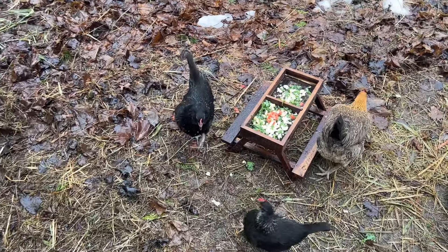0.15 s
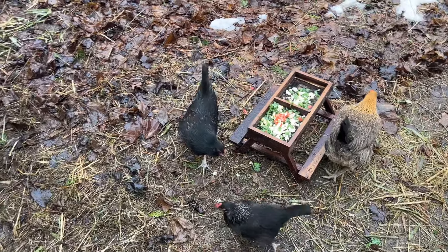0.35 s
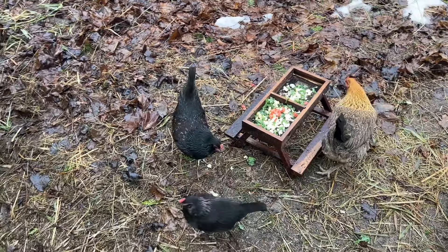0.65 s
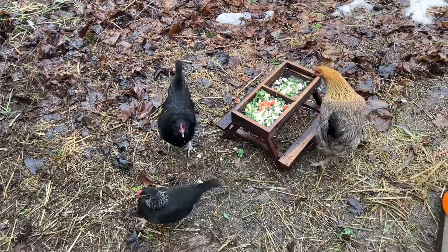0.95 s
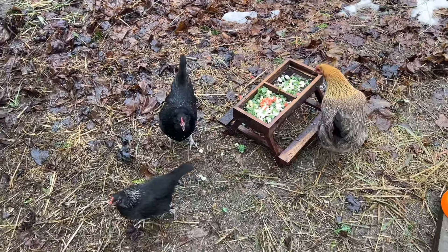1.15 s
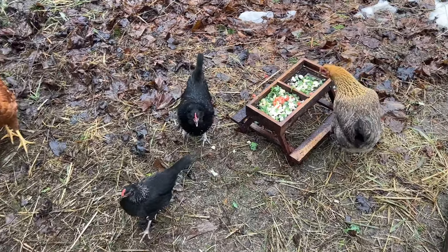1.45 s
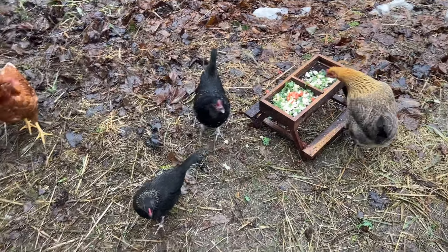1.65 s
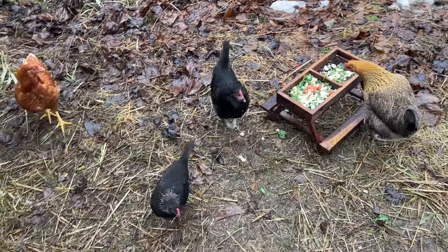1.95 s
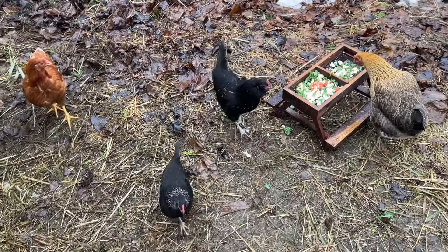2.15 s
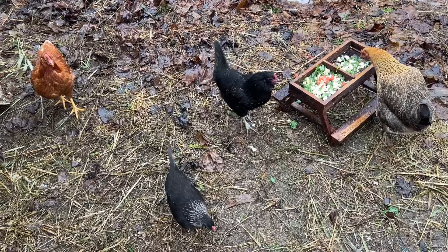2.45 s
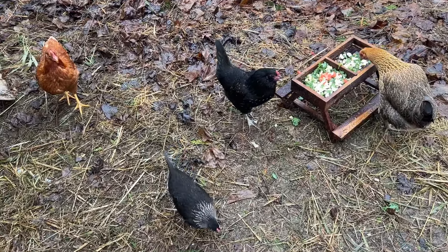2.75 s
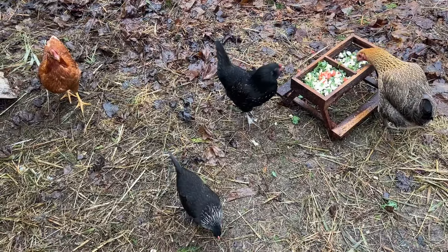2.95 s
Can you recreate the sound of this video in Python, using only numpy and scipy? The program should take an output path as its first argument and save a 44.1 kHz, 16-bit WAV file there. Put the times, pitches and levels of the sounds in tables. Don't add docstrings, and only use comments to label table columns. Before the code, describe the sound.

A hen close by squawks twice, each call starting low and flipping into a long, breaking whistle, with short clucks and another hen's soft croon, straw rustling, over wind buffets and distant traffic in an open yard.

```python
import sys
import numpy as np
from scipy import signal
from scipy.fft import rfft, irfft
from scipy.io import wavfile
from scipy.ndimage import uniform_filter1d

SR = 44100
rng = np.random.default_rng(int(sys.argv[2]) if len(sys.argv) > 2 else 0)


def wav_record(signal):
    frames = np.transpose(np.atleast_2d(signal))
    bounded = np.clip(frames, -1, 1)
    quanta = np.round(bounded * 32767).astype(np.int16)
    wavfile.write(sys.argv[1], SR, quanta)


def voltage_ratio(level):
    return 10 ** (np.asarray(level, float) / 20)


N = 136710
T = np.arange(N) / SR
BIN_HZ = np.fft.rfftfreq(N, 1 / SR)


def evened(x):
    return x / np.sqrt(np.mean(x ** 2) + 1e-20)


def read(points, hz):
    f, value = np.transpose(points)
    return np.interp(np.log(hz + 1), np.log(f + 1), value)


def wander(hz, size=N):
    return evened(signal.lfilter(*signal.butter(2, hz, fs=SR), rng.standard_normal(size)))


def colour(x, points):
    hz = np.fft.rfftfreq(x.shape[-1], 1 / SR)
    return irfft(rfft(x) * voltage_ratio(read(points, hz)), x.shape[-1])


def gate(start, length, edge):
    return np.clip(np.minimum(T - start, start + length - T) / edge + .5, 0, 1)


# start in seconds, length in seconds, share of pitch lost.
SLIPS = [(0.842, .01, .09), (0.86, .008, .06), (0.918, .014, .14), (1.038, .007, -.09), (1.068, .007, .05),
         (1.124, .015, .14), (1.221, .013, .08), (1.242, .012, .035), (1.248, .008, .09),
         (1.273, .009, .09), (1.368, .009, .06), (1.485, .006, .05), (1.512, .005, .05), (1.527, .006, .05),
         (1.621, .01, .12), (1.643, .008, .13), (2.163, .004, .05), (2.19, .004, .06), (2.202, .009, .08),
         (2.23, .004, .04), (2.246, .004, .05), (2.253, .012, .15), (2.27, .02, .16), (2.315, .014, .14),
         (2.337, .007, .11), (2.398, .033, .15), (2.493, .011, .13), (2.551, .008, .12), (2.594, .007, .14),
         (2.626, .008, .15), (2.676, .011, .18), (2.692, .005, .11), (2.711, .004, .07)]
# start in seconds, length in seconds, half-line level in dB.
PULSE_DOUBLING = [(1.023, 0.022, -10.5), (1.133, 0.037, -9), (1.287, 0.068, -22.5), (1.406, 0.026, -4),
                  (1.558, 0.039, -5.5), (1.59, 0.008, -24), (1.637, 0.04, -16.5), (1.661, 0.014, -8),
                  (2.151, 0.048, -7.5), (2.246, 0.0078, -14), (2.287, 0.034, -3), (2.44, .045, -16.5),
                  (2.559, 0.061, -12.5), (2.712, 0.011, -11.5), (2.783, 0.025, -15.5)]
# start in seconds, length in seconds, change in dB.
DROPOUTS = [
    (0.482, 0.032, -2.5),
    (0.527, 0.012, -15.5),
    (0.602, 0.0059, -20),
    (0.625, .012, 7),
    (0.712, 0.017, -11),
    (0.761, .014, -4),
    (2.009, 0.0096, -8.5),
]
SLIP_EDGE_S, SLIP_LEVEL_DB, SLIP_ROUGH = .0025, -30, .7
FLUTTER, JITTER = .013, .09
BRIGHTEN_DB_PER_OCTAVE = .3


def voice(rows, throat, rough, patchy_db=1.01, hiss_db=-40):
    s, hz, db = np.transpose(rows)
    on = (T >= s[0]) & (T < s[-1])
    t = T[on]
    n = len(t)

    slip = 0
    for start, length, loss in SLIPS:
        deepening = 0.6 + .55 * np.clip((T - start) / length, 0, 1)
        slip = slip + loss * gate(start, length, SLIP_EDGE_S) * deepening
    slip = slip[on]
    half = sum(voltage_ratio(d) * gate(a, w, 0.0032) for a, w, d in PULSE_DOUBLING)[on]
    rough = np.clip(rough + SLIP_ROUGH * abs(slip) + 0.23 * half, 0, .9)
    level = np.interp(t, s, db) + sum(d * gate(a, w, 0.0038) for a, w, d in DROPOUTS)[on]

    shake = FLUTTER * wander(110, size=n) + JITTER * rough * wander(460, size=n)
    f = np.interp(t, s, hz) * (1 - slip + shake)
    turns = np.cumsum(f) / SR

    k = np.arange(1, 39)[:, None] / 2
    effort = BRIGHTEN_DB_PER_OCTAVE * (level - db.max()) * np.log2(np.maximum(k, 2) / 2)
    gains = voltage_ratio(read(throat, k * f) + effort)
    gains = gains * np.where(k % 1, half, 1) * (k * f < 15800)
    drift = np.array([wander(84, size=n) for _ in k])
    shimmer = voltage_ratio(drift * 1.05 * np.minimum(k - .5, 4))
    lines = gains * shimmer * np.cos(2 * np.pi * k * turns + k ** 2)
    tone = lines.sum(0) / np.sqrt((gains ** 2).sum(0) / 2)

    air = (0.39 + np.exp(-(turns % 1) / 0.39)) * rng.standard_normal(n)
    breath = evened(colour(air, [(1200, -26.5), (2200, -11.5), (5000, -9.0), (15000, -25.5)]))
    hiss = breath * voltage_ratio(hiss_db + 2.5 * wander(30, size=n))
    rasp = evened(colour(air, throat))

    envelope = gate(s[0] + 0.0016, s[-1] - s[0] - .002, 0.0013)[on]
    envelope = envelope * voltage_ratio(level + SLIP_LEVEL_DB * abs(slip) + patchy_db * wander(28, size=n))
    out = np.zeros(N)
    out[on] = envelope * (np.sqrt(1 - rough ** 2) * tone + rough * rasp + hiss)
    return out


# time in seconds, pitch in Hz, level in dB.
LOW_START_1 = [
    (.165, 553, -48),
    (.19, 566.6, -42),
    (.31, 640, -34),
    (.326, 634, -40.5),
    (.332, 790, -34),
    (.358, 817, -31.5),
    (.37, 960, -50),
]
WAVERING_1 = [
    (.368, 1204, -38.5),
    (.384, 1074, -47),
    (.424, 1058, -35.5),
    (.436, 1144, -42),
    (.51, 1250, -43.5),
    (.545, 1151, -41.5),
    (.6, 1191, -38.5),
    (.622, 1246, -48),
    (.8, 1381, -47.5),
]
HIGH_WHISTLE_1 = [
    (.8, 1397, -44),
    (.83, 1340, -36.5),
    (.88, 1370, -35),
    (1.09, 1369, -31.5),
    (1.32, 1422, -30.5),
    (1.38, 1391, -30.5),
    (1.55, 1458, -29),
    (1.68, 1419, -26.5),
    (1.7, 1320, -32.5),
]
# frequency in Hz, gain in dB.
LOW_THROAT_1 = [(500, 7.5), (1200, 2.5), (1600, 10.5), (1720, -13.5), (1950, -3.5), (2500, -17.5),
                (4000, -37.5), (15000, -57)]
HIGH_THROAT_1 = [(700, -10), (1350, 6), (2300, 1.5), (2850, -4.5), (4200, -15.5), (5600, -21.5),
                 (7000, -17), (15000, -46)]


def first_squawk():
    waver_throat = [(1100, 0), (2200, -3), (2600, -8), (3300, -30), (3900, -19), (6000, -40)]
    x = voice(LOW_START_1, LOW_THROAT_1, .05)
    x += voice(WAVERING_1, waver_throat, .3, patchy_db=2.5)
    return x + voice(HIGH_WHISTLE_1, HIGH_THROAT_1, .07, hiss_db=-29)


# time in seconds, pitch in Hz, level in dB.
LOW_START_2 = [
    (1.974, 677, -35),
    (1.982, 707, -24),
    (1.992, 774, -26.5),
    (2.008, 803, -23),
    (2.02, 823, -34.5),
    (2.043, 848, -37),
    (2.05, 824, -28),
    (2.105, 820, -25.5),
    (2.114, 853, -44.5),
]
HIGH_WHISTLE_2 = [
    (2.11, 1300, -41),
    (2.118, 1500, -26),
    (2.127, 1099, -37.5),
    (2.156, 1169, -32),
    (2.16, 1340, -25.5),
    (2.25, 1360, -24.5),
    (2.295, 1440, -24.5),
    (2.779, 1522, -22.5),
]
FALLING_END_2 = [
    (2.776, 1330, -25),
    (2.782, 1247, -26.5),
    (2.795, 1130, -30),
    (2.81, 1085, -28.5),
    (2.814, 902, -22),
    (2.825, 839, -22.5),
    (2.836, 744, -36.5),
]
# frequency in Hz, gain in dB.
LOW_THROAT_2 = [(700, -0.5), (1500, 4.5), (2400, -13), (3100, -38.5), (3900, -26), (6500, -29),
                (15000, -26.5)]
HIGH_THROAT_2 = [(600, -20.5), (1500, 6), (2000, -1.5), (2600, -18.5), (3000, -25), (4400, -23),
                 (7000, -48), (15000, -58)]
FALL_THROAT = [(700, -5.5), (1100, 1.5), (1500, 3), (1750, 8), (2100, -0.5), (2500, -15), (3700, -24),
               (15000, -41)]


def second_squawk():
    x = voice(LOW_START_2, LOW_THROAT_2, .01, hiss_db=-50)
    x += voice(HIGH_WHISTLE_2, HIGH_THROAT_2, .05, hiss_db=-31)
    return x + voice(FALLING_END_2, FALL_THROAT, .15, hiss_db=-28)


# start in seconds, length in seconds, pitch in Hz, level in dB.
CLUCK_NOTES = [
    (0.154, 0.045, 776, -40.5),
    (0.636, 0.02, 1050, -55),
    (0.661, 0.019, 750, -46),
    (0.694, 0.019, 1180, -37),
    (0.753, 0.04, 825, -39),
    (0.796, 0.013, 850, -32.5),
    (1.699, 0.0066, 957, -28.5),
    (2.012, 0.018, 1004, -27),
    (2.032, 0.02, 1033, -31),
]
CLUCK_SAG = 0.049


def clucks():
    dull = [(800, -0.5), (1600, -23.5), (4000, -46.5)]
    bright = [(800, -12), (1800, 13), (2300, 9), (3200, -28.5), (6000, -30)]
    x = np.zeros(N)
    for start, length, hz, db in CLUCK_NOTES:
        track = [(start, hz, db - 5.5),
                 (start + length * 0.35, hz, db),
                 (start + length, hz * (1 - CLUCK_SAG), db - 5.0)]
        x += voice(track, dull if start < .3 or hz < 805 else bright, 0.35)
    return x


# time in seconds, pitch in Hz, level in dB.
CROON_TRACK = [
    (0.38, 413, -50.5),
    (.41, 446, -48.5),
    (0.5, 461, -44),
    (.66, 440, -47.5),
    (0.7, 435, -59.5),
]


def croon():
    return voice(CROON_TRACK, [(450, 8.5), (1800, -89)], 0.067)


def hens():
    return first_squawk() + second_squawk() + clucks() + croon()


# start in seconds, length in seconds, pitch in Hz, level in dB.
CHEEP_NOTES = [
    (.04, .04, 5750, -60),
    (.1, .09, 4850, -61),
]


def cheeps():
    x = np.zeros(N)
    for start, length, hz, db in CHEEP_NOTES:
        level = voltage_ratio(db + 3 * np.tanh(wander(50)))
        x += level * gate(start, length, .012) * np.sin(2 * np.pi * hz * T)
    return x


# time in seconds, level in dB.
STRAW_LEVEL = [
    (0, -61),
    (.12, -68.5),
    (.4, -76.5),
    (.5, -65),
    (.7, -52.5),
    (.9, -69),
    (1.1, -82.5),
    (2.75, -77.5),
    (2.85, -61.5),
    (3.02, -70.5),
]
# time in seconds, level in dB.
STRAW_TICKS = [
    (2.871, -65),
    (2.953, -44.5),
]


def straw():
    rustle = evened(colour(rng.standard_normal(N), [(1500, -0.5), (5000, 3.5), (15000, -12.0)]))
    x = rustle * voltage_ratio(np.interp(T, *np.transpose(STRAW_LEVEL), -120, -120))
    sharp = evened(colour(rng.standard_normal(N), [(2000, -21), (7000, -11), (15000, -14.5)]))
    for s, db in STRAW_TICKS:
        x += sharp * (T > s) * voltage_ratio(db - 60 * np.abs(T - s) / 0.024)
    return x


YARD_DB, YARD_T60_S = -17, .09


def yard(x):
    t = np.arange(SR // 3) / SR
    sparse = rng.random((2, len(t))) < .05
    tail = rng.standard_normal((2, len(t))) * sparse * voltage_ratio(-60 * t / YARD_T60_S) * (t > .004)
    tail = tail / np.linalg.norm(tail[0])
    return voltage_ratio(YARD_DB) * signal.fftconvolve(x[None], tail, axes=1)[:, :N]


# middle in seconds, length in seconds, level in dB, top in Hz.
WIND_GUSTS = [(1.221, 0.11, -45, 180), (1.384, 0.072, -25.5, 130), (1.556, 0.14, -34.5, 200),
              (0.31, 0.021, -41, 111), (0.698, 0.029, -43.5, 110), (1.516, 0.022, -37, 402),
              (1.597, 0.016, -40, 353), (1.726, 0.049, -37, 120), (1.872, 0.1, -33.5, 183),
              (1.941, 0.019, -24, 376), (2.021, 0.072, -31.5, 460), (2.271, 0.11, -33.5, 398),
              (2.402, 0.12, -38, 388), (2.512, 0.45, -43.5, 249)]


def wind():
    out = np.zeros((2, N))
    rel = BIN_HZ / 58
    for middle, length, db, top_hz in WIND_GUSTS:
        shape = rel ** 4 / (1 + rel ** 4.72) / (1 + (BIN_HZ / top_hz) ** 4)
        air = evened(irfft(rfft(rng.standard_normal(N)) * shape, N))
        swell = np.exp(-((T - middle) / length) ** 2 * 2)
        out += air * voltage_ratio(db + 6 * np.tanh(wander(30))) * swell
    return out


# frequency in Hz, gain in dB.
WASH_COLOUR = [(35, -20), (100, 7.5), (300, -7), (800, 1), (1500, -8.5), (2800, -23), (6000, -33.5),
               (15000, -37.5)]
WASH_DB = -46
HUM_HZ, HUM_WIDTH_HZ, HUM_DB = 65, 14, -43


def traffic():
    wash = np.array([evened(colour(rng.standard_normal(N), WASH_COLOUR)) for _ in range(2)])
    wash = wash * voltage_ratio(WASH_DB + 1.6 * wander(6))
    band = 1 + ((BIN_HZ - HUM_HZ) / HUM_WIDTH_HZ) ** 4
    hum = irfft(rfft(rng.standard_normal((2, N))) / band, N)
    return wash + voltage_ratio(HUM_DB) * evened(hum)


# frequency in Hz, left lead in radians.
TREBLE_TURN = [(7000, 0), (9350, -np.pi), (10800, -np.pi), (12700, -2 * np.pi), (13200, -2 * np.pi),
               (14500, -2.3 * np.pi)]


def ports(x, turn, lean, same=((1, 1),)):
    low = np.clip((9300 - BIN_HZ) / 2500, 0, 1)
    z = rfft(np.atleast_2d(x))
    c = 1 - low * (1 - np.clip(read(same, BIN_HZ), 0, 1))
    turn = read(turn, BIN_HZ)
    whole_turns = 2 * np.pi * np.round(turn[-1] / 2 / np.pi)
    turn = low * turn + (1 - low) * whole_turns + read(TREBLE_TURN, BIN_HZ)
    half = voltage_ratio(low * read(lean, BIN_HZ) / 2) * np.exp(.5j * turn)
    left = z[0] * half
    right = (c * z[0] + np.sqrt(1 - c ** 2) * z[-1]) / half
    return irfft([left, right], N)


# frequency in Hz, left lead in radians.
NEAR_PHASE = [(100, 8.5), (900, -1.6), (1400, 1.4643), (3000, 4), (3800, 7.5), (4500, 5.5), (6600, 13.5)]
FAR_PHASE = [(40, 0), (350, .5), (700, 1.9), (1100, 2.2), (2100, 5.9), (6600, 6.6)]
# frequency in Hz, left minus right in dB.
NEAR_BALANCE = [(300, -2), (900, -1.5), (2400, -10), (3050, -0.5), (3800, 8), (4500, 4.5), (5900, 13),
                (7200, 7)]
FAR_BALANCE = [(2000, 0.5), (3800, 14), (5900, 20.3), (7300, 3)]
# frequency in Hz, correlation from 0 to 1.
FAR_LIKENESS = [ (40, .88), (150, 0.94), (500, 0.95), (1200, 0.36), (2500, 0.13)]


def scene():
    birds = hens()
    near = birds + cheeps() + straw()
    far = yard(birds) + wind() + traffic()
    return ports(near, NEAR_PHASE, NEAR_BALANCE) + ports(far, FAR_PHASE, FAR_BALANCE, FAR_LIKENESS)


def top_cut(x):
    return signal.sosfilt(signal.butter(12, 15830, fs=SR, output="sos"), x)


def record(dry):
    power_db = 10 * np.log10(abs(uniform_filter1d((dry ** 2).mean(0), 2000)) + 1e-12)
    fall_db = T * 40
    held_db = np.maximum.accumulate(power_db + fall_db) - fall_db
    over_db = np.maximum(held_db + 21, 0)
    ducked = dry / voltage_ratio(0.31 * uniform_filter1d(over_db, 2000))
    mix = signal.oaconvolve(ducked, signal.firwin(511, 15750, fs=SR)[None], "same")
    return top_cut(mix)


dry = scene()
out = record(dry)
wav_record(out)
```